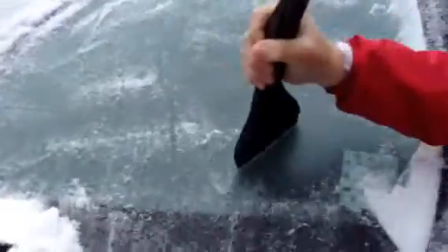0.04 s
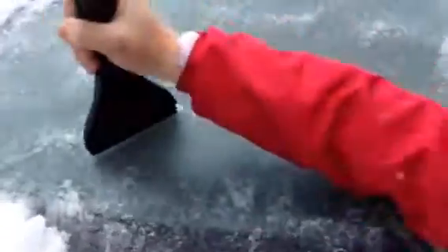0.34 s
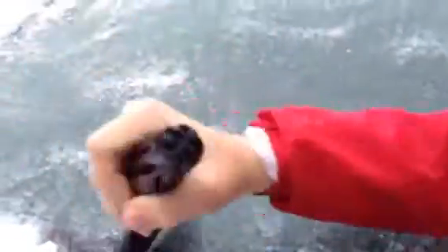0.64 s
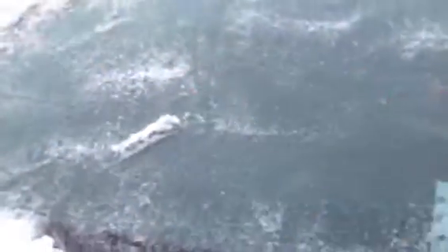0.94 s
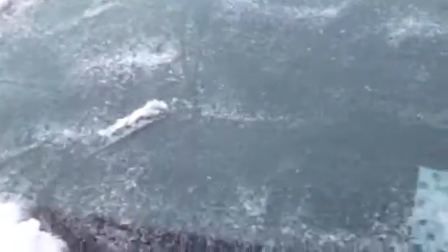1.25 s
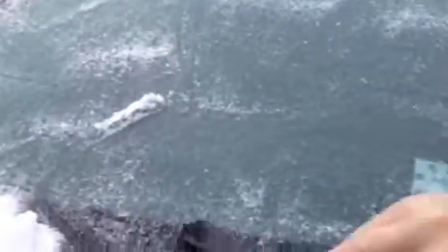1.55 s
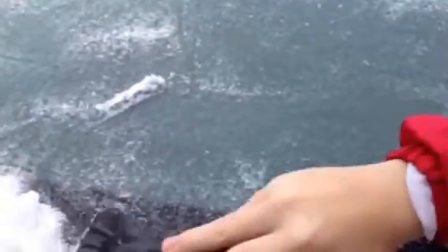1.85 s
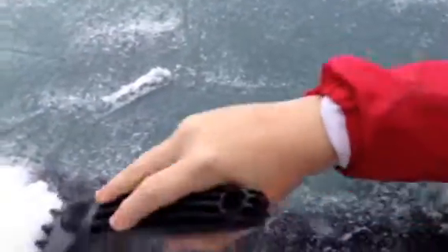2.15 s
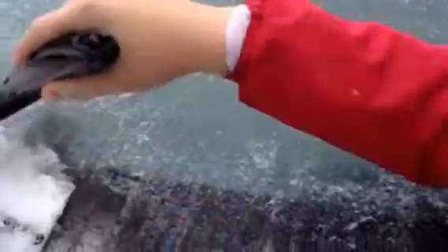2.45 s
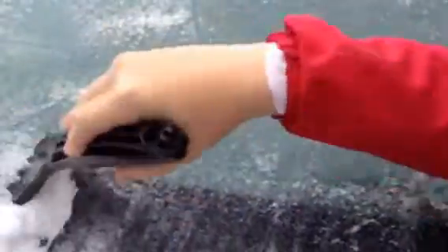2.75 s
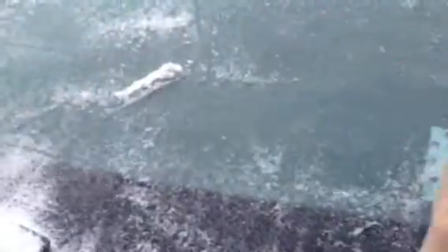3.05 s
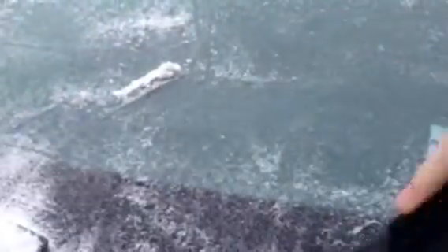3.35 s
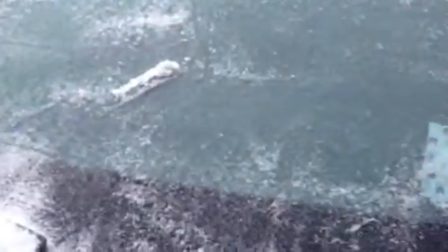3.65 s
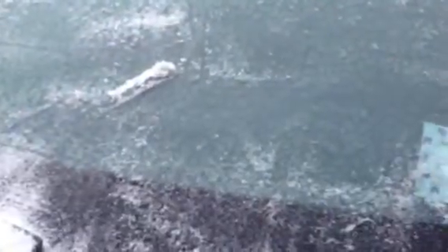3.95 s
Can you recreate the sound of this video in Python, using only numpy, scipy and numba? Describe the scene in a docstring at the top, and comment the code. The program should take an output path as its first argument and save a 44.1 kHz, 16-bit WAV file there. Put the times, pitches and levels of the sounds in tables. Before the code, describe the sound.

Close, crunchy scraping of ice from a windscreen. The plastic blade pushes, squeaks faintly, skips, then knocks back onto the glass before each of three more bouts. A parked car's engine hums low throughout.

```python
"""A car idles while, close by, a plastic scraper is pushed over its iced windscreen.
From the start the blade sticks and slips; each slip breaks ice grains that ring the blade and the glass.
The second push squeaks faintly, then the blade skips over ridges of ice, slides on loose frost and is
knocked back onto the glass at 1.2 s. Three more bouts of scraping follow, near 1.35, 2.7 and 3.5 s,
each begun with a knock. The engine hums underneath to the end."""
import sys
import numpy as np
from scipy import signal
from scipy.fft import rfft, irfft
from scipy.io import wavfile
from scipy.ndimage import uniform_filter1d
from numba import njit

SR = 44100
rng = np.random.default_rng(int(sys.argv[2]) if len(sys.argv) > 2 else 0)


def pcm_store(signal):
    """Save signal as 16-bit PCM."""
    levels = np.round(np.clip(np.atleast_2d(signal), -1, 1) * 32767)
    wavfile.write(sys.argv[1], SR, levels.astype(np.int16).T)


N = 176400  # 4 seconds


def from_db(db):
    """Turns decibels into a factor to multiply by."""
    return 10 ** (np.asarray(db) / 20)


def unit_level(x):
    """Scales a signal so that its average power is 1."""
    return x / np.sqrt(np.mean(x ** 2) + 1e-20)


def evened(x, size=1300):
    """Holds the level at 1 over `size` samples (1300 is about 30 ms) and keeps the finer grain."""
    return x / np.sqrt(np.abs(uniform_filter1d(x ** 2, size)) + 1e-12)


def seconds():
    """The time of every sample."""
    return np.arange(N) / SR


def gate(start, end, attack_s, release_s):
    """Rises quickly at the start, holds until the end, then dies away."""
    t = seconds()
    return np.clip((t - start) / attack_s, 0, 1) * np.exp(-np.clip((t - end) / release_s, 0, 20))


def drift(rate_hz):
    """A slow random wobble, about 1 in size."""
    step = 40  # samples between random values
    r = np.exp(-2 * np.pi * step * rate_hz / SR)
    slow = signal.lfilter([1], [1, -2 * r, r * r], rng.standard_normal(N // step + 2002))[2000:]
    return np.interp(np.arange(N) / step, np.arange(len(slow)), unit_level(slow))


def coloured(x, spectrum, size=4096):
    """Gives a sound the tone colour of a (pitch, level) table; white noise keeps its power."""
    hz, db = np.transpose(spectrum)
    bin_hz = np.arange(size // 2 + 1) * SR / size
    gain = from_db(np.interp(np.log(bin_hz + 1), np.log(hz), db))
    # folding the cepstrum makes the filter ring after a hit, never before it
    cepstrum = irfft(np.log(gain))
    cepstrum[1:size // 2] *= 2
    cepstrum[size // 2 + 1:] = 0
    response = irfft(np.exp(rfft(cepstrum)))
    return signal.fftconvolve(x, response / np.linalg.norm(response))[:N]


@njit
def gliding_peak(x, w, g, q):
    """Multiplies the sound near a moving pitch w (radians a sample) by g squared."""
    out, s1, s2 = np.zeros(len(x)), 0., 0.
    for i in range(len(x)):
        a, c = np.sin(w[i]) / (2 * q), -2 * np.cos(w[i])
        out[i] = ((1 + a * g) * x[i] + s1) / (1 + a / g)
        s1 = c * (x[i] - out[i]) + s2
        s2 = (1 - a * g) * x[i] - (1 - a / g) * out[i]
    return out


def resonance(x, hz, db, q):
    """Boosts the sound around one pitch, steady or moving; a higher q makes the boost narrower."""
    w = 2 * np.pi * np.minimum(hz / SR, .45) * np.ones(N)
    return gliding_peak(x + 1e-18, w, float(from_db(db / 2)), float(q))


# the notes in the engine's hum: (pitch [Hz], level [dB])
ENGINE_TONES = [(146, -46), (189, -39), (232, -39), (278, -47.5), (314, -48.5)]
# the tone colour of its rumble: (pitch [Hz], relative level [dB])
ENGINE_RUMBLE = [(25, -43), (55, -34.5), (110, -9.5), (145, -1), (200, 6), (260, -1.5), (370, -13),
                 (550, -7), (800, -14.5), (1200, -24), (2000, -22.5), (3000, -30.5), (4400, -31),
                 (6000, -40), (7600, -38), (10000, -42), (15000, -54)]
def engine_idle():
    """The engine hums under the bonnet, its tones wavering over a soft rumble."""
    rumble_db, wander_hz, flutter = -33, 2.625, 0.22
    out = from_db(rumble_db) * coloured(rng.standard_normal(N), ENGINE_RUMBLE)
    for hz, db in ENGINE_TONES:
        phase = 2 * np.pi * (np.cumsum(hz + wander_hz * drift(4.12)) / SR + rng.random())
        out = out + np.sqrt(2) * from_db(db) * (1 + flutter * drift(15.5)) * np.sin(phase)
    return out


def stick_slip(uneven_db, count=2000):
    """The force on the edge: uneven slips, each a jump that dies away, over a steady drag."""
    typical_per_s, jitter, decay_s = 150, .55, 0.0044
    gaps_s = np.exp(jitter * rng.standard_normal(count)) / typical_per_s
    at = (np.cumsum(gaps_s) * SR).astype(int)
    sizes = from_db(uneven_db * np.clip(rng.standard_normal(count), -2, 2))
    slips = np.zeros(N)
    slips[at[at < N]] = sizes[at < N]
    return 1 + unit_level(signal.lfilter([1], [1, -np.exp(-1 / (decay_s * SR))], slips))


def ice_grains(per_s=12000, spread_db=2.5):
    """Ice grains break at random, each a tiny click: most small, a few large."""
    sizes = from_db(spread_db * np.minimum(rng.exponential(1, N), 5))
    signs = rng.choice([-1, 1], N)
    return unit_level(sizes * signs * (rng.random(N) < per_s / SR))


def glide(x, times, from_hz, to_hz, db, q):
    """A resonance slides in pitch as the blade travels, and wavers as the hand wobbles."""
    log_pitch = np.interp(seconds(), [times[0], times[-1]], np.log([from_hz, to_hz]))
    return resonance(x, np.exp(log_pitch + 0.026 * drift(4.2)), db, q)


# how the blade and the glass answer one breaking grain: (pitch [Hz], relative level [dB])
BLADE = [(200, -56), (1500, -53), (2900, -22), (3300, -9), (3800, -1), (4300, 4), (4700, 3.5), (5050, -7.5),
         (5500, -7.5), (6500, -10.5), (7200, -5.5), (8000, 2), (8700, -6), (9600, -14), (11500, -14),
         (13000, -12.5), (15300, -14)]
GLASS = [(40, -59), (90, -21), (160, 0), (300, 1.5), (400, 3), (520, 5), (650, 3), (800, -2.5), (1080, -1),
         (1350, -3.5), (1630, 0), (2050, 0), (2400, -3.5), (2900, -12.5), (4000, -28)]
BLADE_Q, GLASS_Q, CRACKLE_HZ, CRACKLE_Q = 7, 1.7, 10970, 2.3
CONTACT_RISE_S, CONTACT_FALL_S = 0.001, 0.0012
# how loud each stroke is as it goes; in a DIG the edge tilts and bites deeper:
# (time [s], blade level [dB], glass level [dB])
PUSH_1 = [(0,-21,-28),(.03,-30.5,-42),(.07,-25.5,-36),(.172,-20.5,-30.5),(.207,-25.5,-38),(.216,-15,-25.5),(.335,-16.5,-26),(.425,-14.5,-22),(.448,-26.5,-33),(.5,-38,-39.5),(.568,-43,-48)]
PUSH_2 = [(0.567, -34, -36), (0.574, -28, -29), (0.592, -21, -26), (0.762, -19, -32.5), (0.766, -38, -34)]
PUSH_3 = [(1.348,-25,-25.5),(1.372,-24,-31),(1.386,-29.5,-31),(1.44,-25,-24.5),(1.48,-32,-27),(1.51,-18.5,-20),(1.561,-24.5,-31)]
DIG_3 = [(1.535,-27.5,-31),(1.585,-21,-25),(1.672,-23.5,-25.5),(1.693,-28.5,-29),(1.775,-29,-32.5),(1.805,-41.5,-38),(1.85,-49,-50)]
PUSH_4 = [(1.849, -48, -46), (1.875, -32, -38.5), (2.022, -28, -30), (2.039, -40, -27.5), (2.052, -44, -55),
          (2.08, -44, -37)]
PUSH_5 = [(2.677, -35, -35), (2.717, -25.5, -31), (2.793, -34, -41.5), (2.913, -18.5, -23.5),
          (2.951, -20, -22), (2.979, -17, -28), (3.077, -17.5, -22)]
DIG_5 = [(3.077, -18, -24.5), (3.115, -22, -22.5), (3.156, -14.5, -22), (3.201, -26.5, -35.5),
         (3.225, -54, -78)]
PUSH_6 = [(3.486, -32.5, -29), (3.521, -26, -34), (3.557, -15.5, -25), (3.636, -23.5, -26),
          (3.657, -15, -24), (3.669, -30, -36), (3.689, -17, -26), (3.704, -65, -33)]
PUSH_7 = [(3.705, -44.5, -43), (3.799, -28, -33), (3.831, -44, -41), (3.852, -34, -43), (3.867, -54, -52),
          (3.915, -42, -53), (3.925, -35, -43), (4.0, -28.5, -35.5)]
STROKES = [PUSH_1, PUSH_2, PUSH_3, DIG_3, PUSH_4, PUSH_5, DIG_5, PUSH_6, PUSH_7]
# how grip and angle colour each stroke, with three sliding resonances:
# (slip unevenness [dB], glass from [Hz], to [Hz], boost [dB], low blade from [Hz], to [Hz], boost [dB],
#  high blade from [Hz], to [Hz], boost [dB], crackle boost [dB])
GRIPS = [(0, 1700, 2100, 7.5, 5300, 4600, 3.5, 8050, 7900, 1.5, 8),
         (-1, 570, 710, 8.5, 4350, 4080, 11, 8700, 8000, 8, 6),
         (0, 760, 530, 8.5, 3400, 3460, 7, 7600, 7300, 9.5, 6),
         (0.5, 1680, 1280, 9.5, 3200, 4200, 5.5, 7700, 10000, 5.5, 3.5),
         (4, 3700, 820, 5, 4000, 3600, -7, 8100, 6100, -2, 2),
         (2.5, 1500, 1270, 5.5, 3500, 3600, -1, 9700, 10000, 2.5, 3),
         (4, 1400, 1000, 8.5, 3760, 4320, 9.5, 8250, 9600, 8, 4),
         (2, 415, 540, 11.5, 3800, 3670, 7, 7450, 6900, 10.5, 0.5),
         (5, 950, 1130, 12, 3300, 3320, 13.5, 7000, 7600, 6.5, 6.5)]
def strokes():
    """Each stroke breaks ice in slips, so the blade rasps and the glass grinds; returns both."""
    blade, glass, t = 0, 0, seconds()
    for stroke, grip in zip(STROKES, GRIPS):
        times, blade_db, glass_db = np.transpose(stroke)
        uneven_db, crackle_db = grip[0], grip[10]
        glass_glide, low_glide, high_glide = grip[1:4], grip[4:7], grip[7:10]
        force = stick_slip(uneven_db)
        contact = gate(times[0], times[-1], CONTACT_RISE_S, CONTACT_FALL_S)
        rasp = coloured(force * ice_grains(), BLADE)
        rasp = glide(rasp, times, *low_glide, BLADE_Q)
        rasp = glide(rasp, times, *high_glide, BLADE_Q)
        rasp = resonance(rasp, CRACKLE_HZ, crackle_db, CRACKLE_Q)
        grind = coloured(force * ice_grains(), GLASS)
        grind = glide(grind, times, *glass_glide, GLASS_Q)
        blade = blade + evened(rasp) * contact * from_db(np.interp(t, times, blade_db))
        glass = glass + evened(grind) * contact * from_db(np.interp(t, times, glass_db))
    return blade, glass


def frost_sizzle(blade):
    """The sizzle of shaved frost roams around two high pitches."""
    for hz in (6310, 10300):
        blade = resonance(blade, hz * np.exp(0.09 * drift(4)), db=6, q=13)
    return blade


def ring_on(x, spectrum, tail_db, fade_s=0.071):
    """Many weak resonances ring on as a smooth tail that drops 60 dB in fade_s."""
    r = np.exp(-2 * np.log(1000) / (fade_s * SR))
    power = signal.lfilter([1 - r], [1, -r], x ** 2)
    return x + from_db(tail_db) * coloured(np.sqrt(power) * rng.standard_normal(N), spectrum)


# narrow resonances of the glass and the plastic: (pitch [Hz], boost [dB])
NARROW_RINGS = [(1075,3.5),(1630,5.5),(1995,5),(3856,-1.5),(4270,2),(5230,6.5),(5938,0),(6615,6.5),(7936,-7.5),(8614,3),(9226,5.5),(10372,3),(12037,8.5)]
def narrow_rings(x, width_hz=75):
    """Glass and plastic favour some exact pitches and weaken a few others."""
    for hz, db in NARROW_RINGS:
        x = resonance(x, hz, db, q=hz / width_hz)
    return x


def reflection(x, delay_s=.0011, share=.3):
    """The sound bounces off the windscreen along a path that changes as the scraper moves."""
    t = seconds()
    moving_delay_s = delay_s * np.exp(.22 * drift(0.521))
    return x + share * np.interp(t - moving_delay_s, t, x)


# the blade catches on a ridge of ice: (time [s], length [s], blade level [dB], glass level [dB])
CATCHES = [(0.07, 0.0055, -25, -33.5), (0.377, 0.012, -12.5, -42), (0.408, 0.015, -13.5, -40),
           (.772, 0.0038, -19, -27.5), (0.78, 0.0085, -16, -27), (0.811, 0.0062, -17.5, -27.5),
           (0.827, 0.0053, -36, -33.5), (0.842, .010, -32, -33.5), (0.865, 0.0049, -22, -34),
           (0.957, 0.011, -23.5, -30), (1.07, 0.0064, -34.5, -28.5), (1.456, 0.0022, -16.5, -28),
           (1.469, 0.0025, -17, -22), (2.022, 0.0045, -24.5, -21), (2.087, 0.021, -37, -37.5),
           (2.125, 0.0026, -39, -39), (2.263, 0.0049, -31, -29), (2.294, 0.0045, -29.5, -32),
           (2.3, 0.0034, -34, -27), (2.311, 0.0028, -24, -26.5), (2.368, 0.002, -31, -45),
           (2.983, 0.0046, -15, -23), (3.121, 0.0049, -38, -21), (3.149, .009, -22, -39),
           (3.195, 0.0028, -20, -44), (3.392, 0.0037, -37, -54), (3.557, 0.0042, -14.5, -40),
           (3.654, 0.0042, -22, -45), (3.672, 0.0022, -19, -24), (3.72, 0.0037, -25, -33),
           (3.742, 0.0029, -37, -37), (3.979, 0.0013, -31, -34)]
# it slides lightly over loose frost; a fade below zero is a swell:
# (time [s], length [s], blade level [dB], glass level [dB], fade [dB])
SLIDES = [(0.81, 0.19, -44.5, -44, 9), (0.96, 0.081, -37, -46, 22), (1.219, 0.04, -38.5, -30.5, 3),
          (1.27, 0.062, -57, -39.5, 0), (1.353, 0.027, -34, -27.5, -0.5), (2.066, 0.3, -54, -57.5, -9),
          (2.376, 0.075, -51.5, -56, -4), (2.461, 0.13, -44, -60, -2.5), (2.611, 0.072, -33.5, -39, 17),
          (3.221, 0.046, -51, -49, -7.5)]
def catches_and_slides():
    """Sharp catches and light slides crush short sprays of ice; returns blade and glass."""
    blade_level, catch_level, slide_level, t = 0, 0, 0, seconds()
    for start, length, blade_db, glass_db in CATCHES:
        shape = gate(start, start + length, CONTACT_RISE_S, CONTACT_FALL_S)
        blade_level = blade_level + shape * from_db(blade_db)
        catch_level = catch_level + shape * from_db(glass_db)
    for start, length, blade_db, glass_db, fade_db in SLIDES:
        fade = from_db(-fade_db * np.clip((t - start) / length, 0, 1))
        shape = gate(start, start + length, attack_s=0.0043, release_s=0.013) * fade
        blade_level = blade_level + shape * from_db(blade_db)
        slide_level = slide_level + shape * from_db(glass_db)
    spray = coloured(blade_level * evened(ice_grains(), size=200), BLADE)
    # a light touch sounds the lower notes of the glass
    rub = resonance(coloured(ice_grains(), GLASS), hz=1010, db=5.5, q=GLASS_Q)
    snaps = coloured(catch_level * evened(ice_grains(), size=200), GLASS)
    snaps = resonance(snaps, hz=1104, db=7.5, q=26)  # a sharp catch sets the glass ringing
    return spray, slide_level * evened(rub) + snaps


def squeak(start_s=0.59, end_s=0.735, hz=2620, db=-37):
    """A faint, rough squeak as the edge chatters at one pitch on smooth ice."""
    b, a = signal.iirpeak(hz, Q=17, fs=SR)
    tone = signal.lfilter(b, a, signal.lfilter(b, a, ice_grains()))
    return from_db(db) * gate(start_s, end_s, attack_s=0.031, release_s=.015) * evened(tone)


# moments when the blade bends: (start [s], end [s], from pitch [Hz], to pitch [Hz], boost [dB])
BENDS = [(.6, 0.795, 5350, 5400, 8.5), (1.52, 1.66, 5070, 5540, 7), (2.854, 3.085, 4500, 5400, 6.5),
         (3.03, 3.205, 5100, 4070, 5), (3.443, 3.496, 7580, 7450, 18)]
def bending(blade):
    """Each time the plastic bends, one resonance swells, slides in pitch and fades."""
    t = seconds()
    for start, end, from_hz, to_hz, db in BENDS:
        swell = np.sin(np.pi * np.clip((t - start) / (end - start), 0, 1))
        hz = np.interp(t, [start, end], [from_hz, to_hz])
        blade = blade + swell * (resonance(blade, hz, db, q=13) - blade)
    return blade


# the scraper is set down on the windscreen: (time [s], blade strength [dB], glass strength [dB],
# thump strength [dB], pitch of the glass at that spot [Hz], crackle boost [dB])
KNOCKS = [(1.1968, -18, -24, -27.5, 880, -1), (1.3484, -30, -19, -54, 1150, 22.5),
          (2.6064, -23, -20, -31, 454, 5), (3.465, -11.5, -19, -19.5, 1050, -1.5),
          (3.477, -17, -34, -44, 1100, 5)]
def knocks(click_size=4, spot_boost_db=9):
    """The plastic edge lands with a hard click and a dying spray of ice; returns blade and glass."""
    blade, glass = 0, 0
    for start, blade_db, glass_db, _, spot_hz, crackle_db in KNOCKS:
        click = np.zeros(N)
        click[int(start * SR)] = click_size
        spray = evened(ice_grains(), size=200)
        edge = coloured(click + spray * gate(start, start, 1 / SR, release_s=0.003), BLADE)
        pane = coloured(click + spray * gate(start, start, 1 / SR, release_s=0.006), GLASS)
        pane = resonance(pane, spot_hz, spot_boost_db, GLASS_Q)
        blade = blade + from_db(blade_db) * resonance(edge, CRACKLE_HZ, crackle_db, CRACKLE_Q)
        glass = glass + from_db(glass_db - spot_boost_db / 2) * pane
    return blade, glass


# the windscreen's low notes: (pitch [Hz], relative level [dB], time to fade by 60 dB [s])
WINDSCREEN_NOTES = [(176, -9, 0.35), (236, -0.5, 0.25), (323, -2, 0.15), (444, 3, 0.078), (505, 4, 0.042),
                    (1230, -11, 0.013)]
def thumps(low_cut_hz=150):
    """Each knock sets the low notes of the windscreen ringing."""
    blows, out = np.zeros(N) + 1e-18, 0
    for start, _, _, thump_db, _, _ in KNOCKS:
        blows[int(start * SR)] = from_db(thump_db)
    for hz, db, fade_s in WINDSCREEN_NOTES:
        r, w = np.exp(-np.log(1000) / (fade_s * SR)), 2 * np.pi * hz / SR
        out = out + from_db(db) * signal.lfilter([0, np.sin(w)], [1, -2 * r * np.cos(w), r * r], blows)
    return signal.sosfilt(signal.butter(4, low_cut_hz, "high", fs=SR, output="sos"), out)


def scene():
    """Scraper and windscreen over the idling engine, in one channel."""
    blade, glass = np.sum([strokes(), catches_and_slides(), knocks()], axis=0)
    blade = frost_sizzle(bending(blade))
    scraping = ring_on(blade, BLADE, tail_db=-18) + ring_on(glass, GLASS, tail_db=-14)
    scraping = reflection(narrow_rings(scraping))
    return (scraping + thumps() + engine_idle() + squeak())[None]


def record(dry, cutoff_hz=15250):
    """The loudest peaks are rounded off and the highest treble is cut."""
    rounded = dry / (1 + dry ** 6) ** (1 / 6)
    return signal.sosfilt(signal.ellip(10, .2, 70, cutoff_hz, fs=SR, output="sos"), rounded)


dry = scene()
out = record(dry)
pcm_store(out)
```